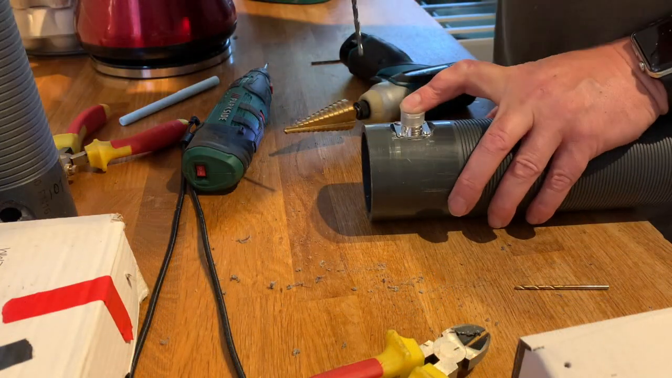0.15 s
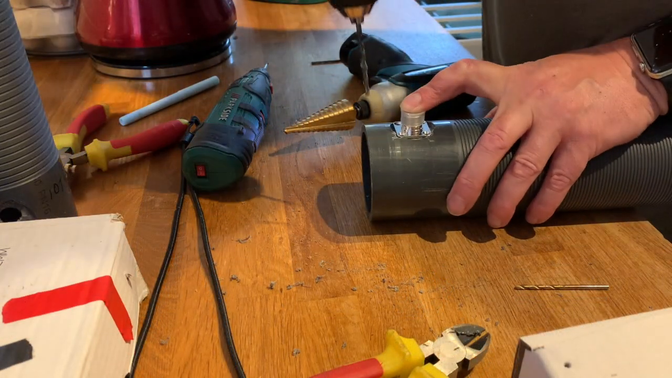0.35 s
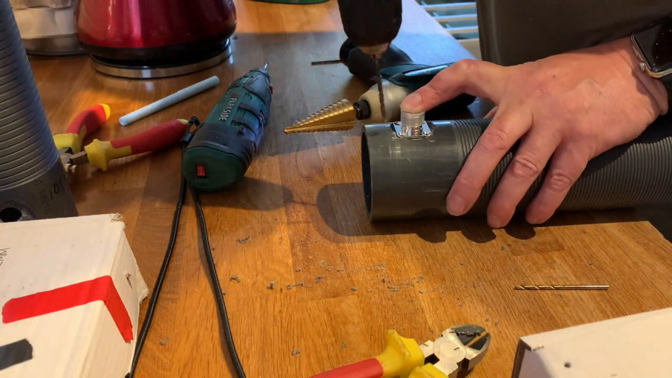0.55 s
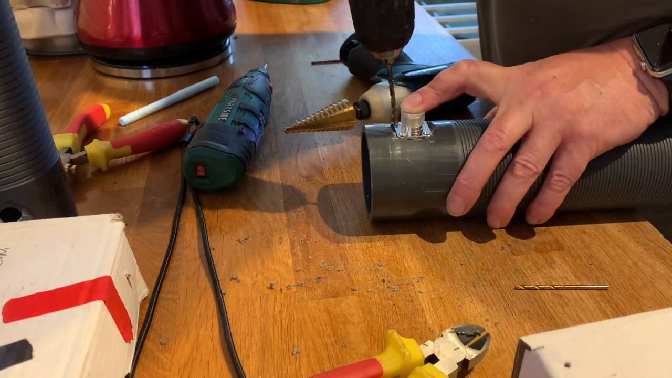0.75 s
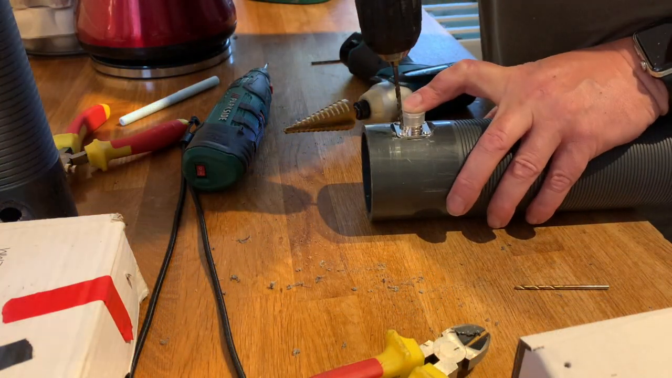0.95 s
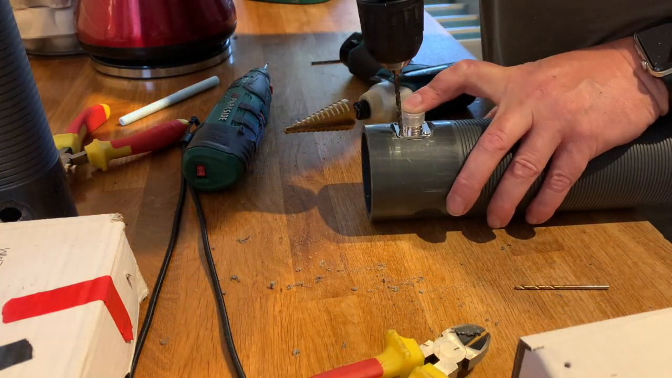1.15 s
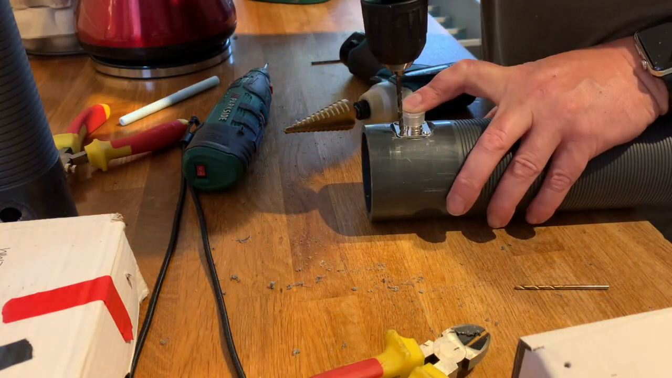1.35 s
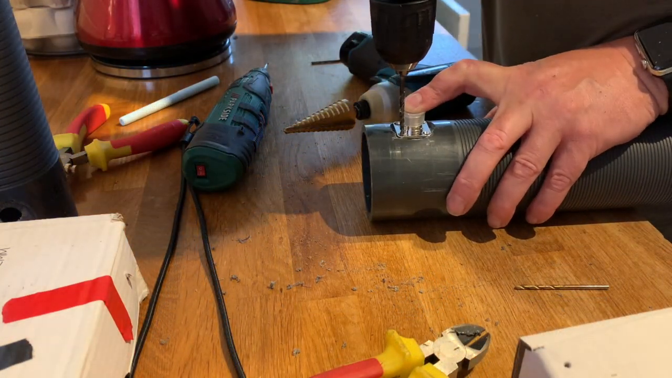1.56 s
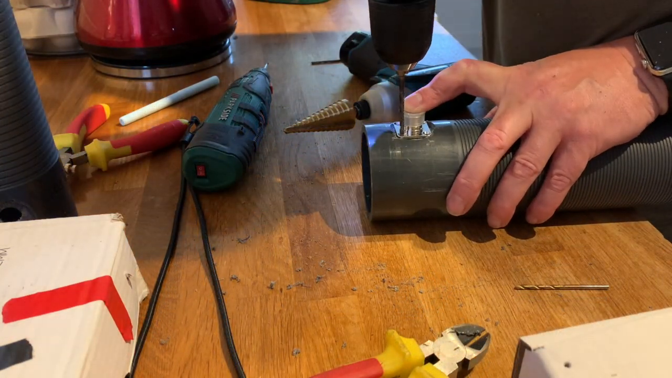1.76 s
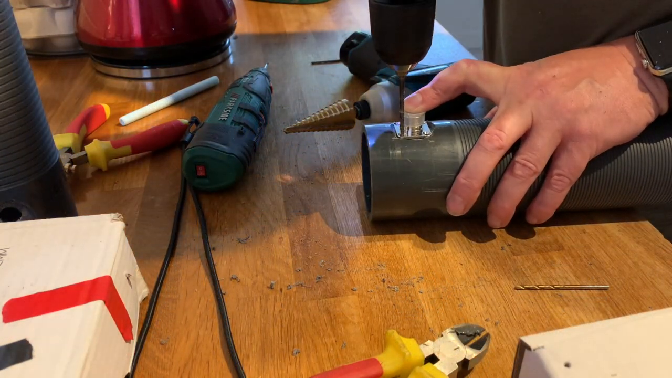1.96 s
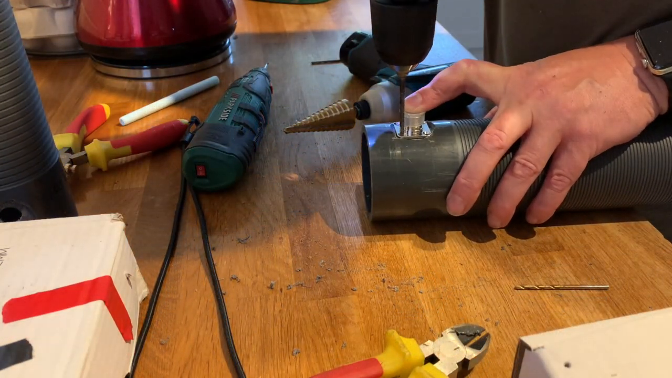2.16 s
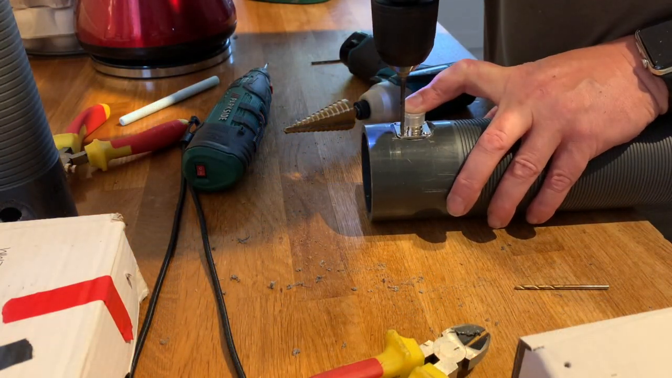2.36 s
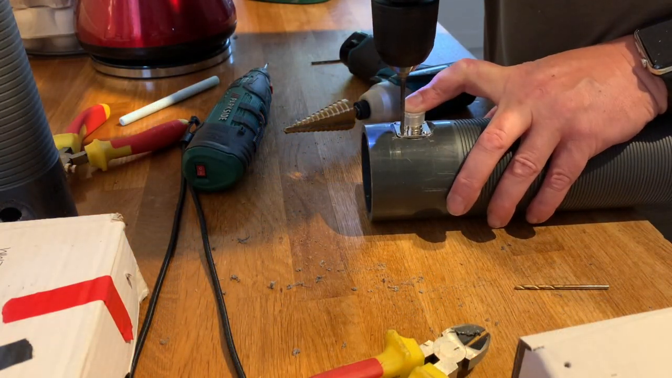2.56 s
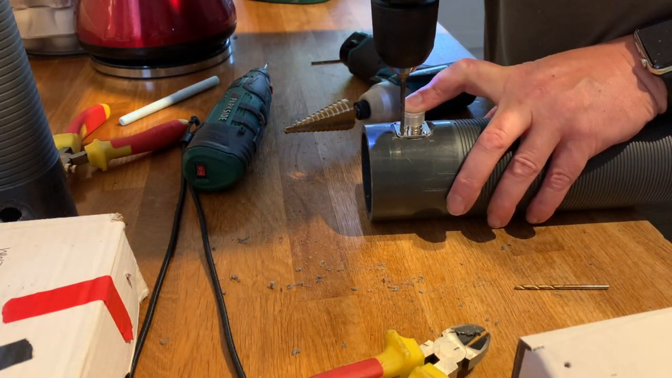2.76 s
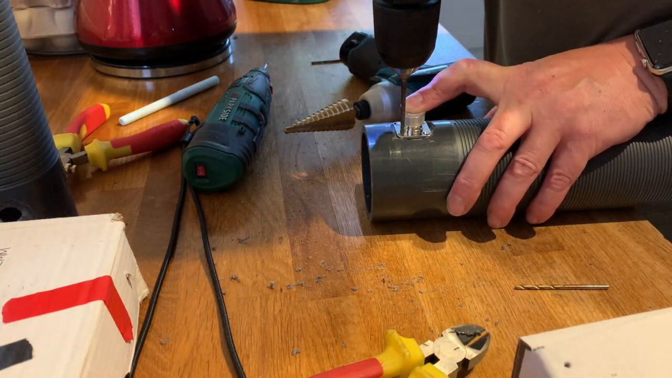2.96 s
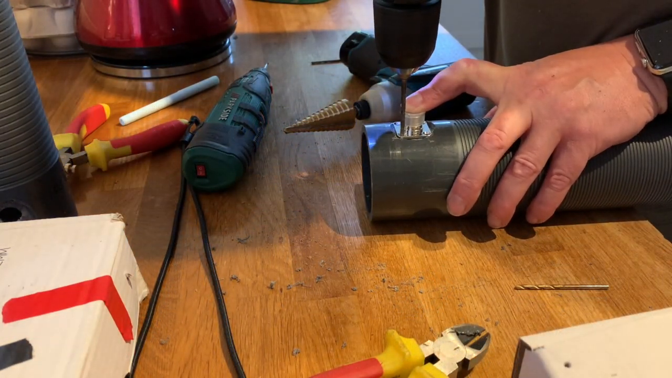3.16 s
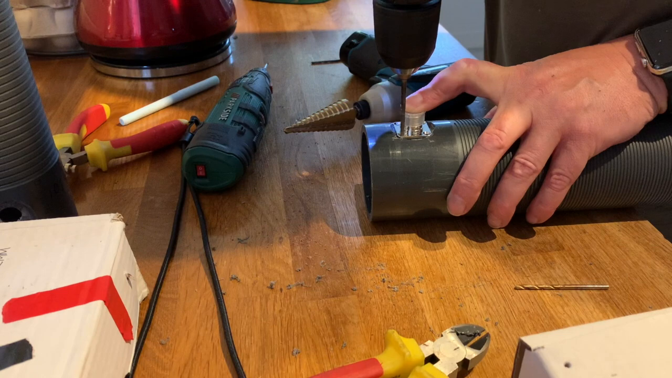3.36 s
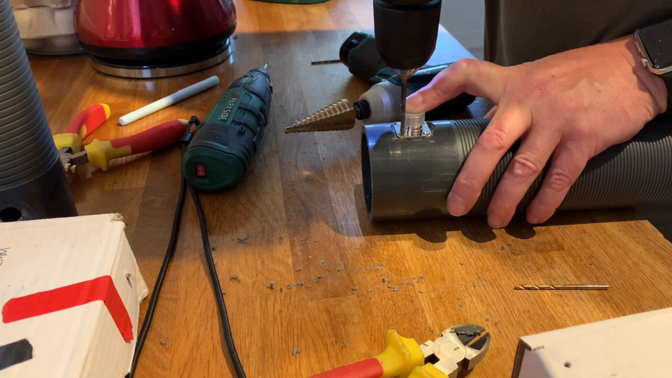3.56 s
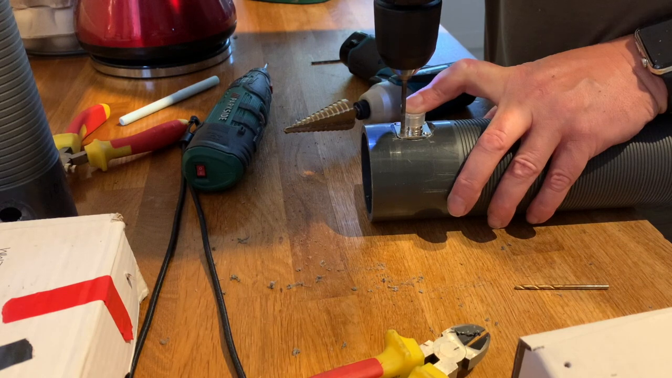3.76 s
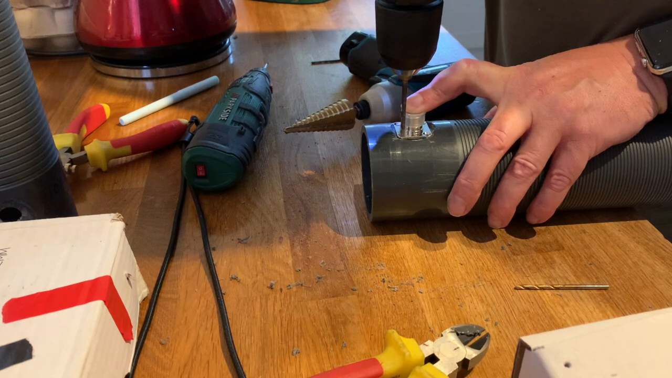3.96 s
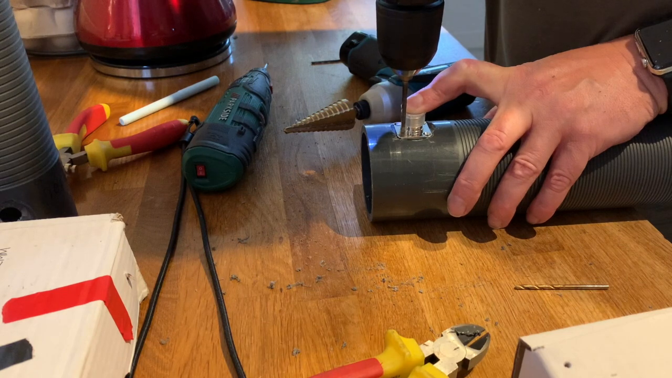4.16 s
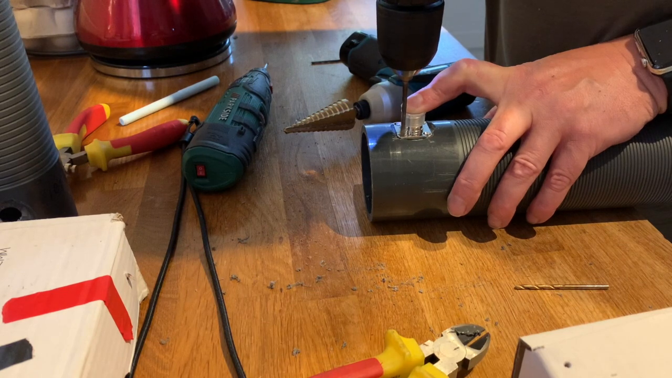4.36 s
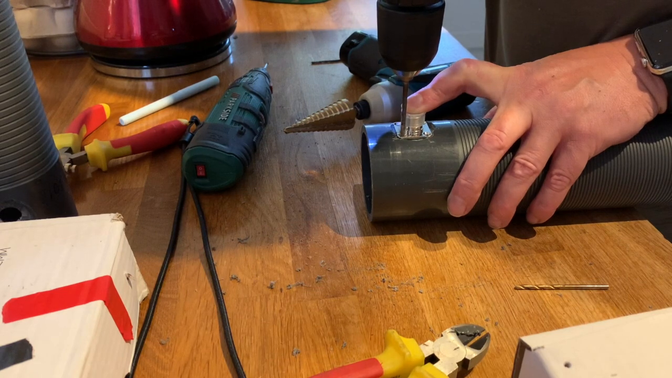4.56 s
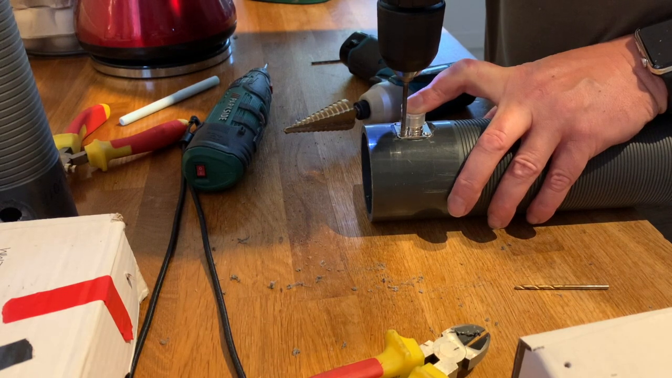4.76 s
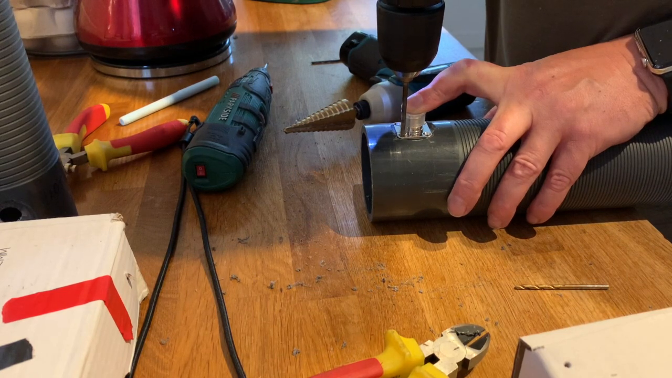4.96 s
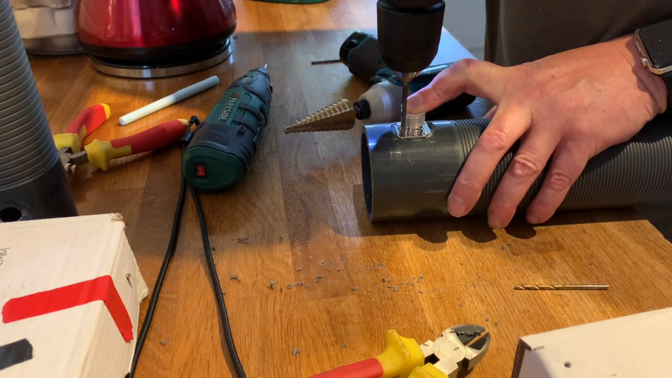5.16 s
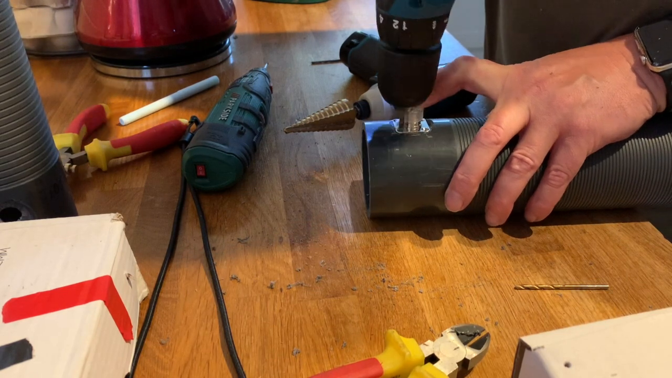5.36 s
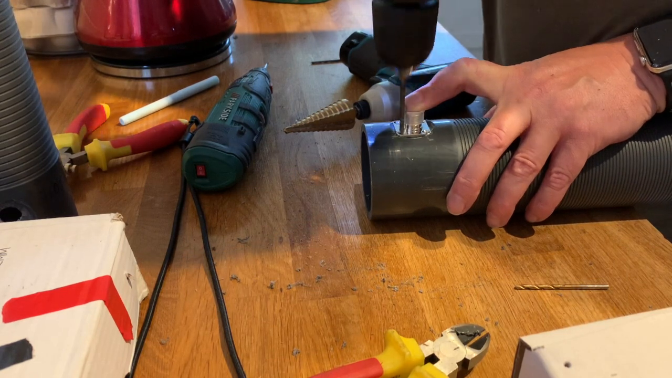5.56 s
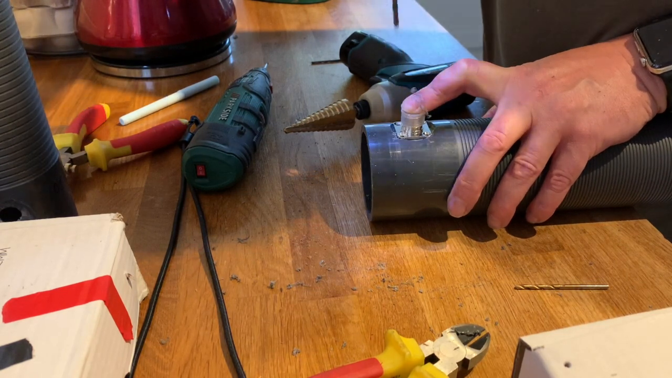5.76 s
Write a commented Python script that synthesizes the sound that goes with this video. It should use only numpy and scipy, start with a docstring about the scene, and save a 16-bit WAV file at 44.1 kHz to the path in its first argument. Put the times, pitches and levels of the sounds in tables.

```python
"""Indoors, close to the microphone: a cordless drill bores a plastic pipe held on a wooden table.
The tool is handled and set down, then spins up; one shaft phase drives hum, whine, brush buzz and gears.
Shaped noise makes brush hiss, rattle, pipe rumble, snags, hand rub and steel slides.
Decaying sines make table jolts and tool ring. The bit snags at the breakthrough; the trigger is let go
and the gears clack to a stop, over a quiet room."""
import sys
import numpy as np
from scipy import signal
from scipy.fft import rfft, irfft, next_fast_len
from scipy.io import wavfile
from scipy.ndimage import uniform_filter1d

SR = 44100
rng = np.random.default_rng(int(sys.argv[2]) if len(sys.argv) > 2 else 0)


def wrap_up_sound(samples):
    """Save the sound to the file named by the first command line argument, as 16-bit audio."""
    columns = np.atleast_2d(samples).T
    # keep every value between -1 and 1, then stretch to whole-number steps
    tamed = np.clip(columns, -1, 1)
    steps = np.round(tamed * 32767).astype(np.int16)
    wavfile.write(sys.argv[1], SR, steps)


N = 256220
TIME = np.arange(N) / SR
FFT_SIZE = next_fast_len(N)
BINS = np.fft.rfftfreq(FFT_SIZE, 1 / SR)

# motor speeds in Hz = turns/s; spans are (from, to) in s
# trigger: half pressed, then squeezed home, then let go
START_S, HALF_HZ, SPIN_UP_S = 1.61, 247, 0.095
SQUEEZE_S, FULL_HZ = (2.12, 2.55), 303
STOP_S, BRAKE_HZ_PER_S, FADE_DB_PER_S = 5.73, 280, 360
# load: bit bites, drags more the longer it cuts, tip comes through the wall, bit comes free
BITE_S, BITE_HZ, DRAG_FROM_S, DRAG_HZ_PER_S = (2.82, 3.4), 3.9, 3.0, 2.05
THROUGH_S, FREE_S = (5.3, 5.72), (5.56, 5.62)
# powers of speed by which gears and brushes grow during spin-up
RATTLE_POWER, BRUSH_POWER = 4.2, 4
SNAG_CHOP = 0.5  # depth of the level break-up in a snag


def drill(hz):
    """One shaft drives everything: unbalance, commutator, brushes and gears."""
    snagging = np.minimum(snags()[0] / undb(-32), 1)
    # the speed staggers in a snag
    flutter = 0.0002 + 0.0012 * snagging
    shaft = 2 * np.pi * np.cumsum(hz * (1 + flutter * walk(60))) / SR
    near_full = np.interp(hz, (276, 295), [0.05, 1])
    electric = whine(shaft, snagging, near_full) + brush_buzz(hz, shaft, near_full) + brush_hiss(shaft)
    return (rotor_hum(hz, shaft, snagging) + running(hz, BRUSH_POWER) * electric
            + gear_mesh(hz, shaft) + gear_rattle(hz, shaft))


# motor sag and recovery as the edges tear through: t/s, speed lost/Hz
SAG = [(5.19, 0), (5.235, 4.8), (5.295, .5), (5.335, 7.5), (5.36, 6.5), (5.41, 2.3), (5.5, 0), (5.57, 3.5),
       (5.7, 1)]


def speed():
    """Motor speed in Hz: what the trigger asks for, less cutting load, snags and brake."""
    spin_up = 1 - np.exp(-np.maximum(TIME - START_S, 0) / SPIN_UP_S)
    asked = HALF_HZ * spin_up + (FULL_HZ - HALF_HZ) * ease(SQUEEZE_S)
    drag = DRAG_HZ_PER_S * np.maximum(TIME - DRAG_FROM_S, 0)
    load = (BITE_HZ * ease(BITE_S) + drag) * (1 - ease(THROUGH_S))
    slowed, = curve(SAG)
    brake = BRAKE_HZ_PER_S * np.maximum(TIME - STOP_S, 0)
    return np.maximum(asked - load - slowed - brake, 0)


def running(hz, power):
    """Gain that grows with the spin-up and fades when the trigger is let go."""
    fade = undb(-FADE_DB_PER_S * np.maximum(TIME - STOP_S, 0))
    return np.minimum(hz / HALF_HZ, 1) ** power * fade


# motor (whole multiples) and gear tones: multiple of motor speed,
# relative level/dB under light load, relative level/dB under heavy load
TONES = [(.87, -63, -55), (1.13, -65, -59), (1.74, -68, -49), (2, -59, -53), (2.14, -58, -62),
         (3, -54, -50), (6, -56, -50), (6.74, -64, -56), (6.83, -58, -53), (8, -52, -55),
         (8.75, -56, -42.5), (9, -55, -50), (9.33, -54, -50), (11.09, -50, -48), (12, -55, -53),
         (15, -51, -50), (15.37, -63, -48), (18, -47, -46), (18.12, -50, -49), (18.22, -47, -46),
         (18.49, -47, -46), (18.67, -48, -48), (18.84, -48, -47), (19.11, -50, -48), (21, -60, -48),
         (23, -47, -49), (24, -43, -45), (25, -44, -45), (27, -40, -43), (29, -45, -43), (30, -46, -45),
         (31, -43, -43), (32, -50, -49), (33, -45, -36), (34, -45, -45), (35, -46, -43), (36, -37, -37),
         (37, -40, -52), (38, -47, -44), (39, -34, -38), (40, -46, -45), (41, -37, -42), (42, -40, -39),
         (48, -48, -45), (53, -65, -46)]
# cutting load on the motor: t/s, load 0-1
LOAD = [(3.1, 0.06), (3.8, 0.97), (5.3, 1), (5.6, 0.7)]


def whine(shaft, snagging, near_full):
    """Commutator and gear tones stand out near full speed and trade strength with load."""
    load, = curve(LOAD)
    tones = sum(undb(light + load * (heavy - light)) * tone(k * shaft) for k, light, heavy in TONES)
    level = undb(-0.5 * ease(FREE_S)) * (1 - ease((5.69, 5.76))) * near_full
    return tones * level * (1 + SNAG_CHOP * snagging * walk(70))


# resonances of the motor can: f/Hz, width/Hz, relative level/dB
CAN_MODES = [(9700, 150, -40), (10400, 150, -39), (10940, 110, -37), (11520, 240, -37), (12100, 400, -41)]


def brush_buzz(hz, shaft, near_full, first=34, last=51, power=4.9):
    """Brush tones at multiples of the speed light up as they glide through the can's resonances."""
    comb = sum(tone(k * shaft) for k in range(first, last + 1))
    can = sum(undb(db) * peak(centre, width) for centre, width, db in CAN_MODES)
    return filtered(comb, can) * (1 - near_full) * running(hz, power)


# brush noise: f/Hz, relative level/dB
BRUSH_COLOUR = [(3000, -21), (7000, -13), (8200, -11), (9700, -4), (11500, -1.5), (13000, 0), (14000, 1.5),
                (14600, -3), (15800, -7.5), (17000, -53)]


def brush_hiss(shaft, level_db=-29, free_db=-1.5, depth=0.074):
    """Brushes scrape hardest once a turn."""
    scrape = grit(2.4, 900) * (1 + depth * np.cos(shaft))
    return undb(level_db + free_db * ease(FREE_S)) * colour(scrape, BRUSH_COLOUR)


def rotor_hum(hz, shaft, snagging, level_db=-33.5, knee_hz=254.6, db_per_hz=0.5, planet_db=-16):
    """Unbalance hums at shaft speed, weaker below the knee; planet wheels add a narrow low band."""
    slow_db = -db_per_hz * np.maximum(knee_hz - hz, 0)
    level = undb(level_db + slow_db - 2 * ease(BITE_S) - 17 * ease(FREE_S))
    unbalance = np.sqrt(2) * np.array([np.sin(shaft), np.cos(shaft)])
    unbalance = unbalance * (1 + SNAG_CHOP * snagging * walk(50))
    planets = band(0.235 * shaft, 10)  # planet turns per motor turn
    return level * (unbalance + undb(planet_db) * planets)


# tooth noise riding on the speed: multiple of motor speed, width/Hz, relative level/dB
TOOTH_BANDS = [(3, 40, -62), (9.1, 300, -49), (18.4, 400, -42)]
# case ring while the motor runs: f/Hz, width/Hz, relative level/dB
CASE_MODES = [(2597, 200, -49.5), (4500, 160, -45), (5560, 300, -49)]


def gear_mesh(hz, shaft, level_db=0.5, through_db=-8, free_db=-3, strain_db=10.5):
    """Meshing teeth ring the case, less so as the tip comes through the wall."""
    # gear strain swells the case ring just before the breakthrough snags
    strain = stroke(5.2, 0.022, 300, 500)
    case = ringing(CASE_MODES) * undb(strain_db * strain)
    teeth = through_case(sum(undb(db) * band(k * shaft, width) for k, width, db in TOOTH_BANDS))
    level = undb(level_db + through_db * ease(THROUGH_S) + free_db * ease(FREE_S))
    return (teeth + case) * running(hz, RATTLE_POWER) * level


# case resonances and a dead spot: f/Hz, width/Hz, lift/dB
CASE_LIFT = [(748, 140, 18), (2160, 400, 11), (4550, 190, 10), (4820, 340, -11)]


def through_case(x):
    """Lift or cut whatever falls on a resonance or dead spot of the case."""
    lift_db = sum(db * peak(hz, width) for hz, width, db in CASE_LIFT)
    return filtered(x, undb(lift_db))


# gear rattle: f/Hz, relative level/dB
RATTLE_COLOUR = [(90, -85), (250, -3), (400, -10), (520, -1.5), (900, -7), (1150, -9), (1500, 4),
                 (2300, 0.5), (3050, -0.5), (3900, -1.5), (7200, -0.5), (9500, -7), (16000, -23)]


def gear_rattle(hz, shaft, level_db=-31.5, free_db=-3, worn_db=-5, ripple_db=2):
    """Dense tooth impacts; part of them repeats with each turn of the planet carrier."""
    carrier_turns = 0.13 * shaft / (2 * np.pi)
    impacts = grit(1.9, 400) + undb(worn_db) * worn_teeth(carrier_turns, 3)
    level = running(hz, RATTLE_POWER) * undb(level_db + free_db * ease(FREE_S))
    return level * crowded(colour(impacts, RATTLE_COLOUR), ripple_db)


def worn_teeth(turns, spread_db, size=1100):
    """The same uneven tooth impacts come round with every turn of a wheel, as a pair."""
    wheels = [unit(teeth[:size]) for teeth in grit(spread_db, 900)]
    return np.array([np.interp(turns * size, np.arange(size), wheel, period=size) for wheel in wheels])


# pipe rumble: f/Hz, relative level/dB
SHAKE_COLOUR = [(25, -20), (42, -7), (64, 1), (76, 6), (98, -9.5), (129, 1), (200, -8.5), (300, -5.5),
                (550, -50)]
# snag chatter: f/Hz, relative level/dB
SNAG_COLOUR = [(30, -16), (54, 2), (85, -7), (130, -2), (200, -10), (290, 1), (450, -7.5), (800, -15.5),
               (2000, -27)]


def pipe(hz, skate_db=-40.5, steadied_db=-4, shake_db=-0.5, catch_hz=58, catch_depth=0.23):
    """The pipe rumbles on the table, steadied by the bite; edges catch and jerk it in the snags."""
    snag, jerked = snags()
    _, shifted = grips()
    driven = running(hz, RATTLE_POWER) * undb(skate_db + steadied_db * ease(BITE_S))
    shake = np.sqrt(driven ** 2 + jerked ** 2 + shifted ** 2)
    catch_phase = 2 * np.pi * np.cumsum(catch_hz * (1 + 0.201 * walk(30))) / SR
    catches = 1 + catch_depth * np.cos(catch_phase)
    rumble = undb(shake_db) * shake * colour(grit(1.2, 25), SHAKE_COLOUR)
    return rumble + snag * colour(grit(0.83, 120) * catches, SNAG_COLOUR)


# cutting edges snag: t/s, held/s, chatter level/dB, relative rumble level/dB
SNAGS = [(3.11, 0.057, -59, -34.5), (5.232, 0.023, -33.5, -34), (5.318, 0.038, -35.5, -37),
         (5.375, 0.13, -33.5, -34), (5.549, 0.021, -29.5, -34), (5.61, 0.12, -43.5, -51)]


def snags(swell_db_per_s=699.5, fall_db_per_s=400):
    """Summed snag strokes: chatter gain, rumble gain."""
    shapes = np.array([stroke(s, held, swell_db_per_s, fall_db_per_s) for s, held, *_ in SNAGS])
    *_, chatter_db, rumble_db = np.transpose(SNAGS)
    return undb(chatter_db) @ shapes, undb(rumble_db) @ shapes


# jolts of the pipe against the table: t/s, relative level/dB
JOLTS = [(1.135, -41), (1.229, -39), (1.249, -35), (1.41, -39), (3.125, -30), (5.23, -15), (5.26, -32),
         (5.366, -21), (5.419, -21), (5.474, -21), (5.489, -20.5), (5.51, -17), (5.523, -22), (5.546, -21),
         (5.56, -26)]
# table ring: nominal f/Hz, relative level/dB, t60/s
TABLE_MODES = [(53.7, -18, 0.14), (75, -5.5, 0.16), (123, -5.5, 0.053), (292, -2.5, 0.033),
               (450, -13.5, 0.022)]


def jolts():
    """Each jolt rings the table top as slightly detuned decaying sines, in the mid channel."""
    out = np.zeros((2, N))
    for s, db in JOLTS:
        age = np.maximum(TIME - s, 0)
        for hz, mode_db, t60 in TABLE_MODES:
            pitch_hz = hz * (1 + 0.034 * rng.standard_normal())
            decay = np.exp(-np.log(1000) * age / t60)
            out[0] -= undb(db + mode_db) * decay * np.sin(2 * np.pi * pitch_hz * age)
    return out


# bit rasps on the rim of the hole: t/s, held/s, level/dB
RASPS = [(5.64, 0.064, -40), (5.733, .006, -31)]
# open pipe: f/Hz, width/Hz, relative level/dB
PIPE_MODES = [(620, 350, -5), (894, 260, -1), (1356, 250, -8.5), (1730, 300, -0.5), (2300, 540, -3)]


def pull_out(scrape_db=-2.5, swell_db_per_s=300, fall_db_per_s=449):
    """The flutes scrape the rim in uneven strokes and ring the pipe."""
    rasp = sum(undb(db) * stroke(s, held, swell_db_per_s, fall_db_per_s) for s, held, db in RASPS)
    return rasp * unit(ringing(PIPE_MODES) * undb(scrape_db * walk(130)))


# knocks of bit, chuck and gears: t/s, level/dB, t60/s, tilt/(dB per octave), tool ring/dB
KNOCKS = [(.328, -30.5, .18, 24, -50), (.455, -30.5, .05, 14, -50), (.479, -28, .05, 14, -50),
          (.719, -50.5, .3, -11.5, -4), (.733, -48, .12, -11, -1.5), (.956, -41.5, .09, -3, 2.5),
          (.964, -43, .15, -4, 3), (.974, -44, .089, -2.5, 1.5), (1.291, -53, .12, -2, -12),
          (1.732, -20, 0.0087, 1, -19), (1.740, -14.5, .011, 2, -20), (5.734, -15, .018, -1, -18),
          (5.745, -29, .03, -3, -11), (5.776, -16.5, .014, 1.5, -22)]
# crack of a knock before tilt: f/Hz, relative level/dB
KNOCK_COLOUR = [(80, -31), (300, -8), (650, 6), (1000, 1.5), (1500, 7), (2300, 7.5), (3100, 6), (4200, 4),
                (7000, -1), (16000, -13.5)]


def knocks(chatter_db=1.5, size=SR // 2, room_t60_s=0.36):
    """Blows on hard plastic and steel; the tool rings, the room answers longer blows more."""
    out, age = np.zeros((2, N + size)), np.arange(size) / SR
    for s, db, t60, tilt_db, ring_db in KNOCKS:
        direct, room = (np.exp(-np.log(1000) * age / t) for t in (t60, room_t60_s))
        room = room * np.sqrt(t60 / room_t60_s)
        tilted = [(hz, level_db + tilt_db * np.log2(hz)) for hz, level_db in KNOCK_COLOUR]
        crack = colour(grit(chatter_db, 300), tilted)[:, :size]
        blow = np.hypot(direct, room) * crack + undb(ring_db) * struck(age, tilt_db)
        start = int(s * SR)
        out[:, start:start + size] += undb(db) * np.minimum(age / 0.0005, 1) * blow
    return out[:, :N]


# ring of the knocked tool: nominal f/Hz, relative level/dB before tilt, t60/s
TOOL_MODES = [(543, -6.5, 0.19), (646, -5, 0.24), (854, -1, .14), (905, -4, 0.11), (1276, -5, .1),
              (1420, -6, .1), (1704, 0, .12), (2070, 2, .27), (2230, 1, .16), (2527, 1, .2), (2632, 1, .26),
              (2859, -3, .26), (3380, -5, 0.24), (3650, -6, .22)]


def struck(age, tilt_db):
    """Tool modes ring out, slightly detuned each blow; a pair scaled to nominal starting rms 1."""
    hz, db, t60 = np.transpose(TOOL_MODES)
    gains = undb(db + tilt_db * np.log2(hz))
    pitches = hz * (1 + 0.0038 * rng.standard_normal(len(hz)))
    starts = rng.uniform(0, 2 * np.pi, (len(hz), 2, 1))
    ring = sum(g * np.exp(-np.log(1000) * age / t) * np.sin(2 * np.pi * f * age + p)
               for g, t, f, p in zip(gains, t60, pitches, starts))
    return ring * np.sqrt(2 / np.sum(gains ** 2))


def handling():
    """Hands rub on tool and pipe while steel slides."""
    return rubbing() + sliding()


# hand rub: f/Hz, relative level/dB
RUB_COLOUR = [(60, -20), (150, -10), (350, 1), (540, 3.5), (830, 2), (1100, -6.5), (2200, -4.5),
              (5000, -13.5), (8000, -22), (16000, -73)]


def rubbing():
    """Skin on plastic: coloured grit under the grip strokes."""
    rub, _ = grips()
    return rub * colour(grit(1.0, 250), RUB_COLOUR)


# grip shifts: t/s, held/s, swell/(dB per s), rub level/dB, relative rumble level/dB
GRIPS = [(.02, 0.09, 120, -41, -52), (.51, .084, 148, -60.5, -57), (.728, .026, 900, -55, -59),
         (.8, 0.089, 298, -58.5, -63), (1.15, .041, 139, -54, -49), (1.305, 0.12, 900, -47, -47),
         (1.53, 0.14, 200, -48, -50.5), (1.735, 0.13, 298, -39, -43.5), (4.865, 0.03, 200, -41.5, -52)]


def grips(fall_db_per_s=117):
    """Summed grip strokes: rubbing gain, rumble gain."""
    shapes = np.array([stroke(s, held, swell, fall_db_per_s) for s, held, swell, *_ in GRIPS])
    *_, rubbing_db, rumble_db = np.transpose(GRIPS)
    return undb(rubbing_db) @ shapes, undb(rumble_db) @ shapes


# steel slide noise: f/Hz, relative level/dB
SLIDE_COLOUR = [(700, -58), (1400, -35), (2100, -14.5), (3000, -9.5), (4400, -7.5), (5000, -3.5),
                (5500, -6.5), (7100, 1), (8200, 0), (9100, 12), (10000, 2.5), (11000, 11), (12000, 0.5),
                (12800, 10), (14000, -1), (15000, 6.5), (17000, -25)]
# ring of the sliding steel bit: f/Hz, width/Hz, relative level/dB
BIT_MODES = [(3550, 240, -8), (7170, 280, -2)]


def sliding(slide_db=2, catch_db=1.0, ripple_db=3.5, split_hz=8240):
    """Steel slides on steel and plastic in small catches, with a thin ring of the bit."""
    slide, treble, sing = slides()
    catches = undb(catch_db * walk(90.9))
    hiss = crowded(colour(grit(1.0, 400), SLIDE_COLOUR), ripple_db)
    dull = signal.sosfiltfilt(signal.butter(4, split_hz, fs=SR, output="sos"), hiss)
    scrape = undb(slide_db) * (slide * dull + treble * (hiss - dull))
    ring = sing * undb(3 * walk(62.0)) * ringing(BIT_MODES)
    return catches * (scrape + ring)


# slides: t/s, held/s, swell/(dB per s), relative levels/dB of hiss, its treble, bit ring
SLIDES = [(.04, .0062, 516, -29, -30, -64), (.335, .005, 2500, -37, -49, -66),
          (.42, 0.046, 300, -52, -46, -50), (.5, 0.031, 290, -28, -30, -48),
          (.745, .0089, 700, -48, -57, -85), (.81, .084, 301, -53, -71, -88),
          (1.16, .037, 500, -72, -76, -90), (1.294, 0.15, 2500, -50.5, -64, -90),
          (1.495, .19, 400, -50, -70, -90)]


def slides(fall_db_per_s=198):
    """Summed slide strokes: gains of hiss, its treble and the ring."""
    shapes = np.array([stroke(s, held, swell, fall_db_per_s) for s, held, swell, *_ in SLIDES])
    *_, hiss_db, treble_db, ring_db = np.transpose(SLIDES)
    return undb(hiss_db) @ shapes, undb(treble_db) @ shapes, undb(ring_db) @ shapes


# room noise: f/Hz, relative level/dB
FLOOR_COLOUR = [(25, 15), (65, 10), (140, 11), (500, -14), (1300, -8), (7000, -7), (16000, -52)]


def room_floor(level_db=-66):
    """Quiet room: steady coloured noise."""
    return undb(level_db) * colour(rng.standard_normal((2, N)), FLOOR_COLOUR)


# stereo width before port phase: f/Hz, side minus mid/dB
WIDTH = [(60, -14.5), (350, -12.5), (700, -1), (1300, 1), (2000, -3.5), (2800, 2), (4000, -2), (8000, 2.5),
         (10000, 1), (15000, 2)]
# diffuse share at the ports: f/Hz, level/dB
DIFFUSE = [(5200, -1.5), (6400, -5), (8500, -66), (15000, -42)]


def stereo(pair, opposed_hz=8600, every_hz=4700):
    """Unrelated mid and side; bass stays near the middle, treble port phase swings with pitch."""
    opposition = np.cos(2 * np.pi * (BINS - opposed_hz) / every_hz)
    opposed = np.clip(1 - response(DIFFUSE), 0, 0.995) * opposition
    width = response(WIDTH) * np.sqrt((1 + opposed) / (1 - opposed))
    mid = filtered(pair[0], np.minimum(1 / width, 1))
    side = filtered(pair[1], np.minimum(width, 1))
    return np.array([mid + side, mid - side])


def tone(phase, waver=0.25):
    """A line that reaches the two ports by different paths and wavers as the tool moves."""
    start = rng.uniform(0, 2 * np.pi)
    steady = np.sqrt(2) * np.array([np.cos(phase + start), np.sin(phase + start)])
    return steady + waver * band(phase, 14)


def band(phase, width_hz):
    """A narrow band of noise around a running phase, as a pair."""
    return np.array([walk(width_hz) * np.cos(phase) + walk(width_hz) * np.sin(phase) for _ in range(2)])


def ringing(modes):
    """Resonances kept ringing by irregular contact."""
    return sum(undb(db) * band(2 * np.pi * hz * TIME, width) for hz, width, db in modes)


def grit(spread_db, rate_hz):
    """Dense tiny impacts of uneven strength, as a pair."""
    return rng.standard_normal((2, N)) * undb(spread_db * walk(rate_hz))


def walk(rate_hz):
    """Smoothed random control of rms 1, a new target rate_hz times a second."""
    k = max(int(SR / rate_hz), 1)
    steps = np.repeat(rng.standard_normal(N // k + 1), k)[:N]
    return unit(uniform_filter1d(steps, k))


def colour(x, points):
    """Filter by a spectrum, to rms 1."""
    return unit(filtered(x, response(points)))


def crowded(x, ripple_db, spacing_hz=45):
    """Many small resonances make a spectrum uneven; rms 1."""
    hz = np.arange(0, SR / 2, spacing_hz)
    ripple = np.interp(BINS, hz, rng.standard_normal(len(hz)))
    return unit(filtered(x, undb(ripple_db * ripple)))


def filtered(x, gain):
    """Weight every FFT bin by a gain."""
    return irfft(rfft(x, FFT_SIZE) * gain, FFT_SIZE)[..., :N]


def response(points):
    """Gain at every FFT bin from (f/Hz, level/dB) points."""
    hz, db = np.transpose(points)
    return undb(np.interp(np.log(BINS + 1), np.log(hz), db))


def peak(hz, width_hz):
    """A bell of height 1 over the FFT bins."""
    return 1 / (1 + (2 * (BINS - hz) / width_hz) ** 2)


def stroke(s, held, swell, fall):
    """Gain that swells to 1 at s, is held and falls away; slopes in dB per s."""
    return undb(-swell * np.maximum(s - TIME, 0) - fall * np.maximum(TIME - s - held, 0))


def ease(span):
    """Smooth step from 0 to 1 over (from s, to s)."""
    u = np.clip((TIME - span[0]) / (span[1] - span[0]), 0, 1)
    return u * u * (3 - 2 * u)


def curve(rows):
    """One control per column, joined by straight lines."""
    s, *columns = np.transpose(rows)
    return [np.interp(TIME, s, c) for c in columns]


def undb(db):
    """Decibels to gain."""
    return 10 ** (np.asarray(db) / 20)


def unit(x):
    """Scale to rms 1."""
    return x / np.sqrt(np.mean(x ** 2))


def scene():
    """Tool, pipe and hands over a quiet room."""
    hz = speed()
    work = drill(hz) + pipe(hz) + jolts() + pull_out()
    return stereo(work + knocks() + handling() + room_floor())


def record(dry, low_cut_hz=44, top_hz=15900):
    """Cut the deep bass gently and the top steeply."""
    thin = signal.sosfilt(signal.butter(4, low_cut_hz, "high", fs=SR, output="sos"), dry)
    return signal.sosfilt(signal.ellip(10, 0.2, 80, top_hz, fs=SR, output="sos"), thin)


dry = scene()
out = record(dry)
wrap_up_sound(out)
```